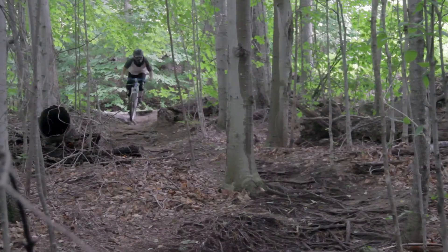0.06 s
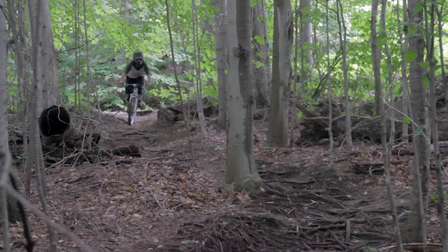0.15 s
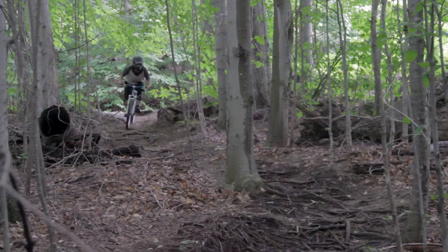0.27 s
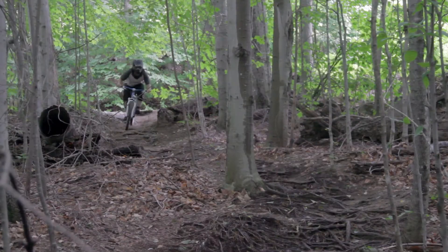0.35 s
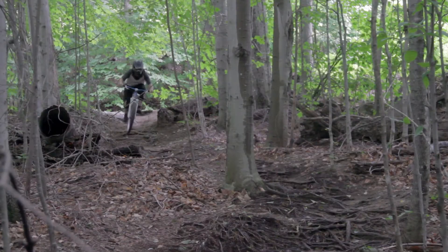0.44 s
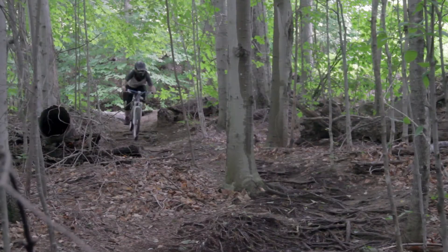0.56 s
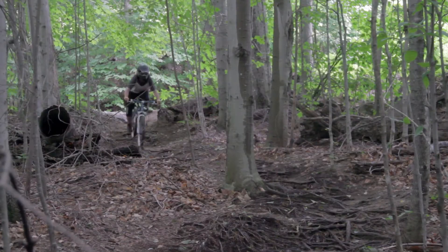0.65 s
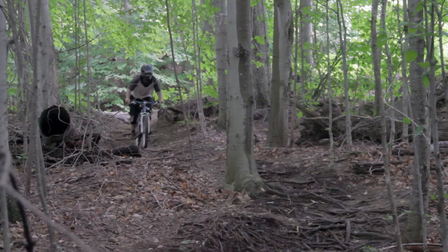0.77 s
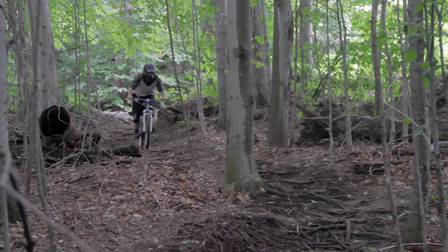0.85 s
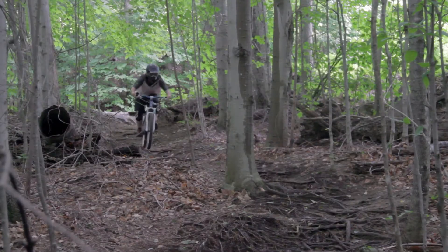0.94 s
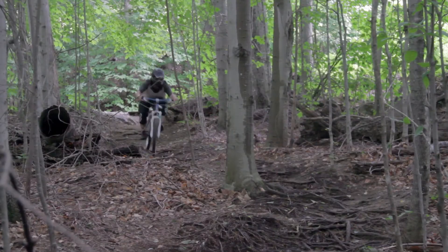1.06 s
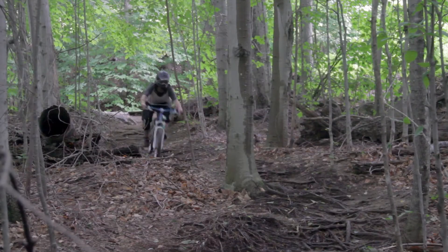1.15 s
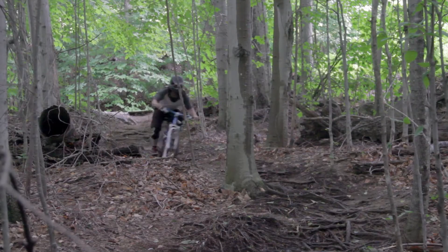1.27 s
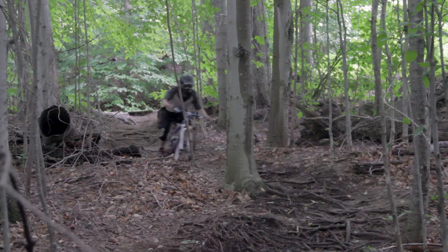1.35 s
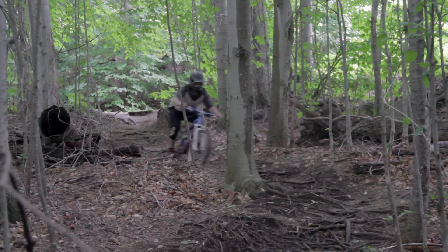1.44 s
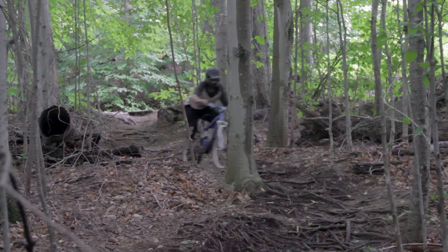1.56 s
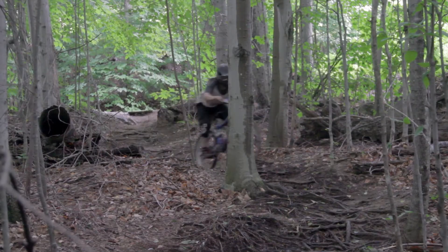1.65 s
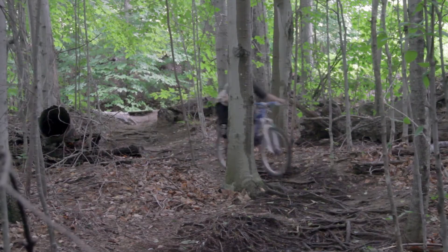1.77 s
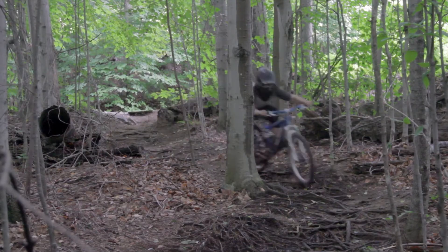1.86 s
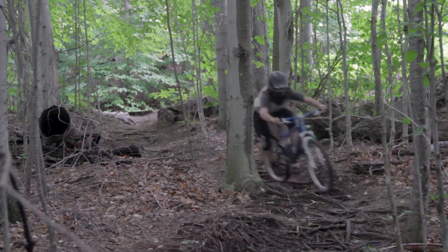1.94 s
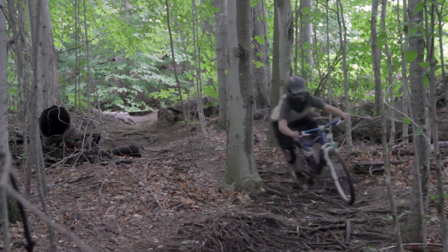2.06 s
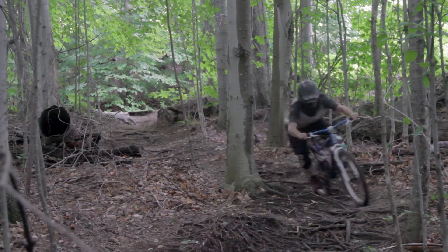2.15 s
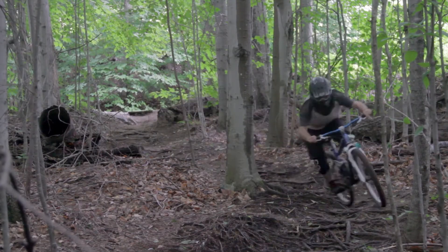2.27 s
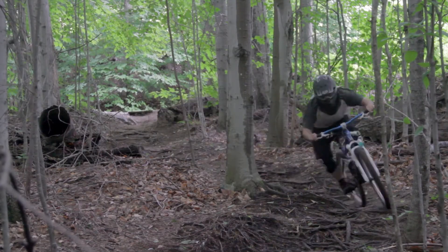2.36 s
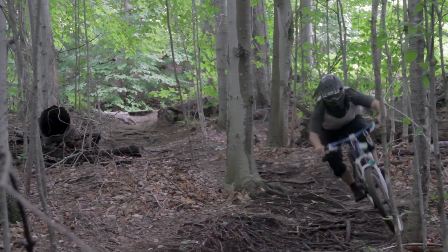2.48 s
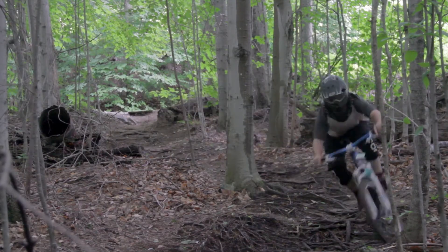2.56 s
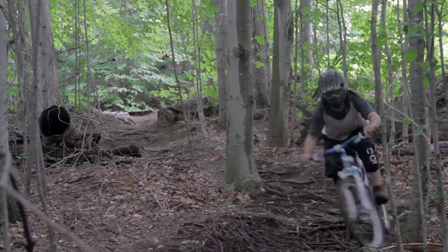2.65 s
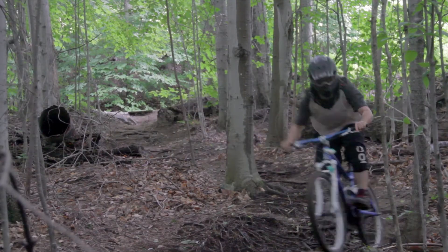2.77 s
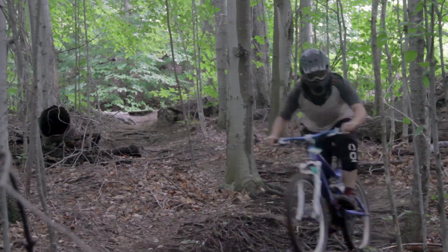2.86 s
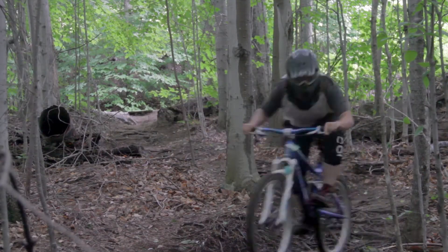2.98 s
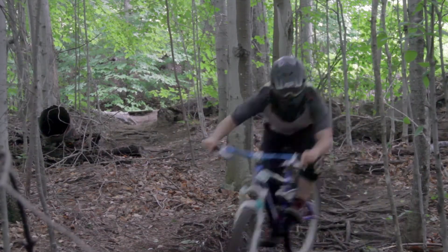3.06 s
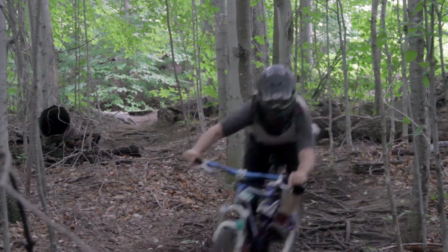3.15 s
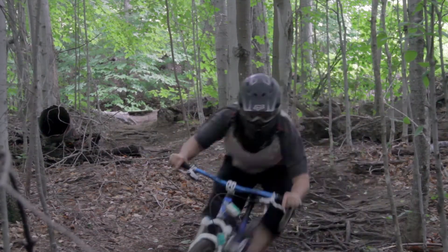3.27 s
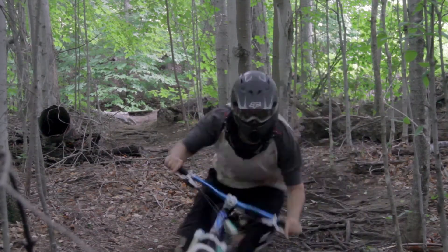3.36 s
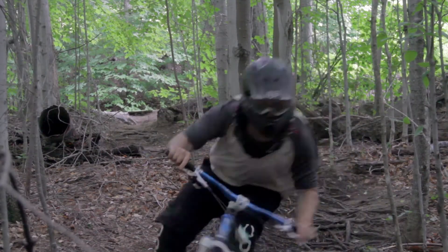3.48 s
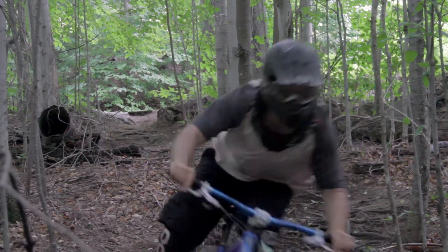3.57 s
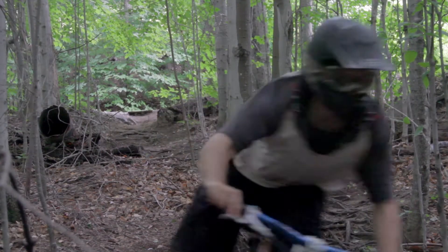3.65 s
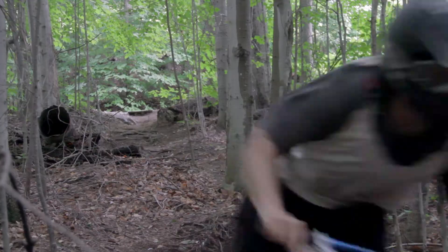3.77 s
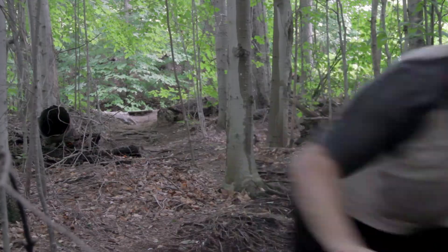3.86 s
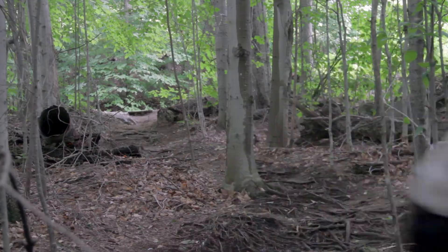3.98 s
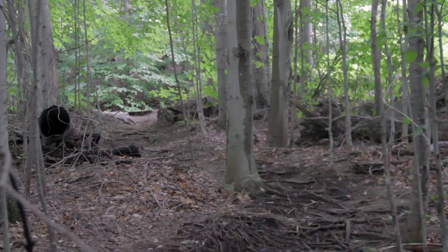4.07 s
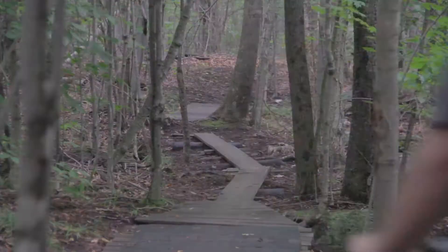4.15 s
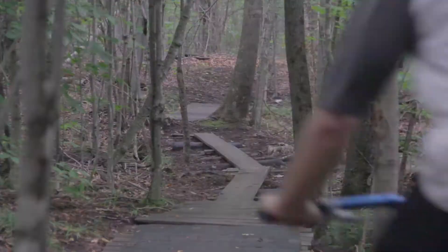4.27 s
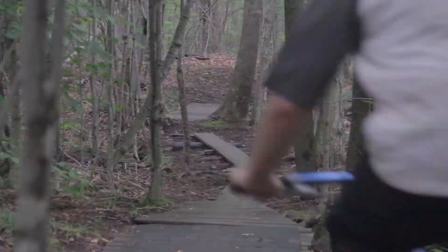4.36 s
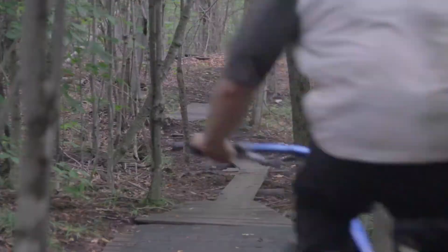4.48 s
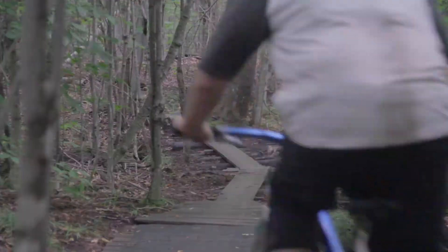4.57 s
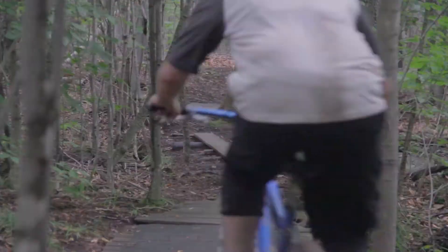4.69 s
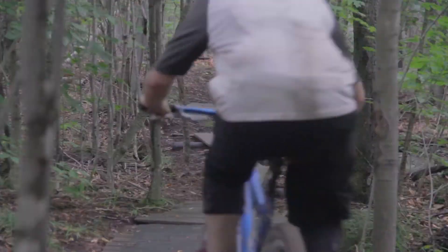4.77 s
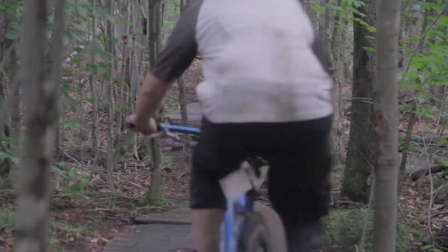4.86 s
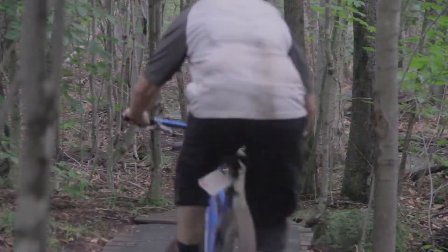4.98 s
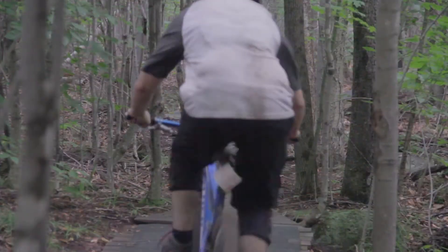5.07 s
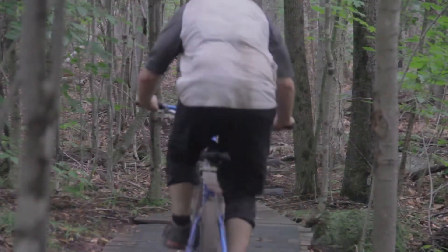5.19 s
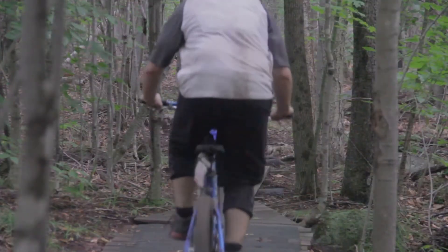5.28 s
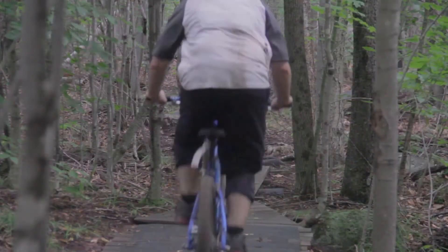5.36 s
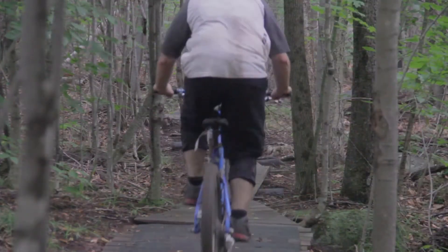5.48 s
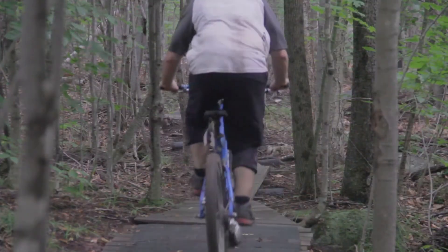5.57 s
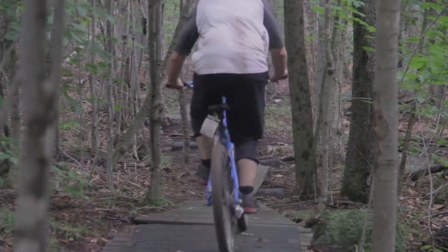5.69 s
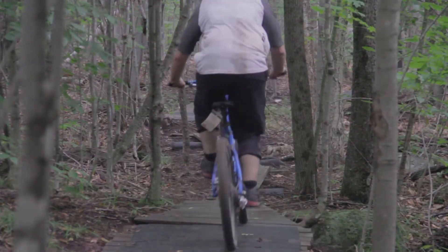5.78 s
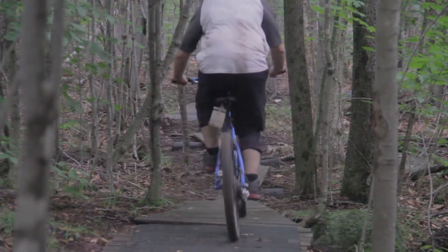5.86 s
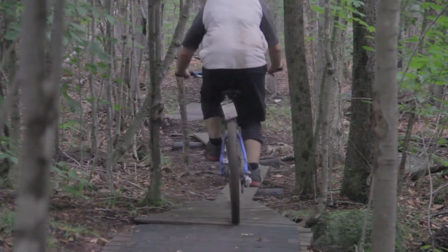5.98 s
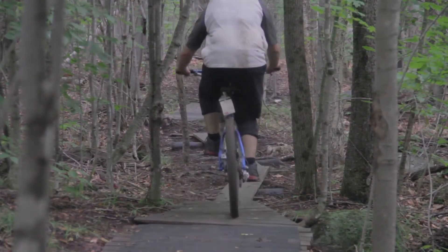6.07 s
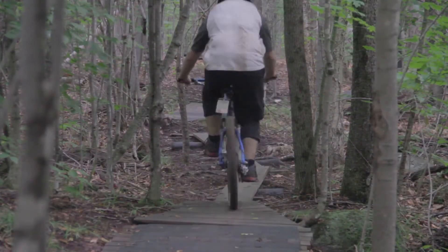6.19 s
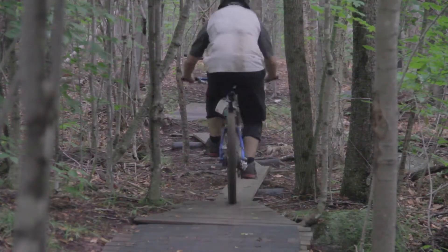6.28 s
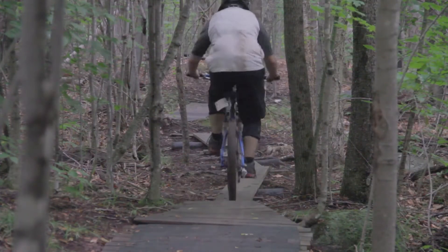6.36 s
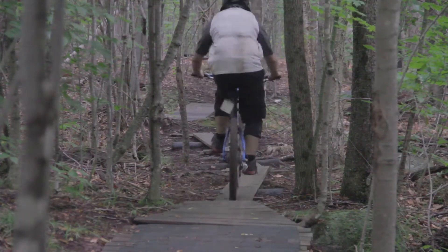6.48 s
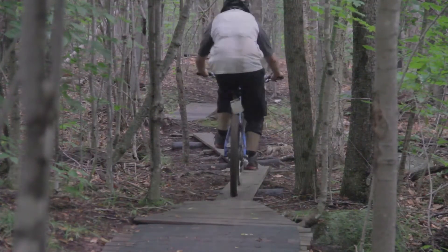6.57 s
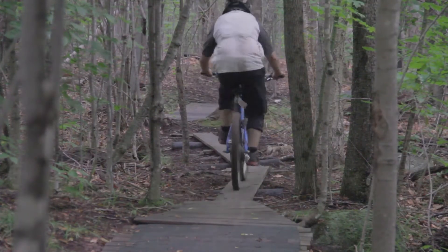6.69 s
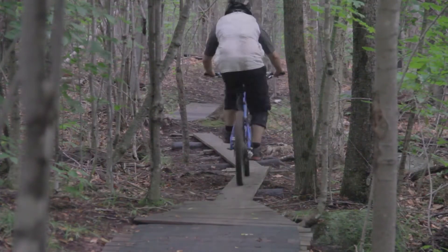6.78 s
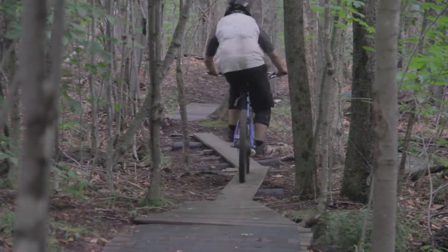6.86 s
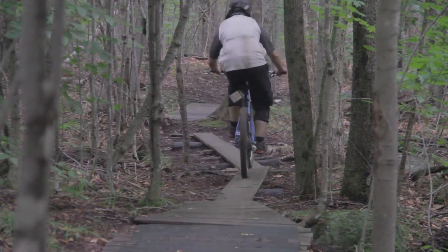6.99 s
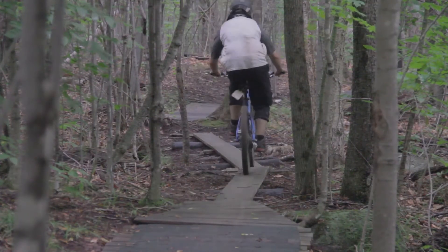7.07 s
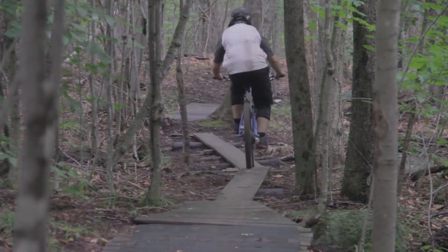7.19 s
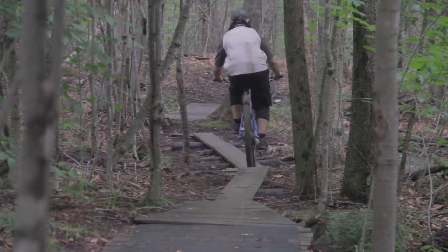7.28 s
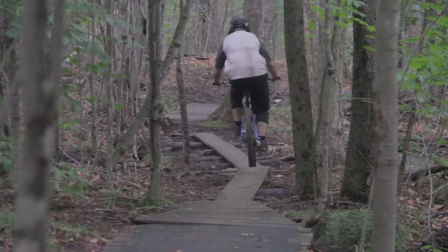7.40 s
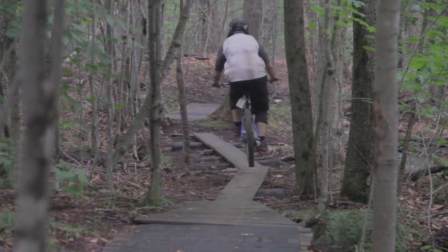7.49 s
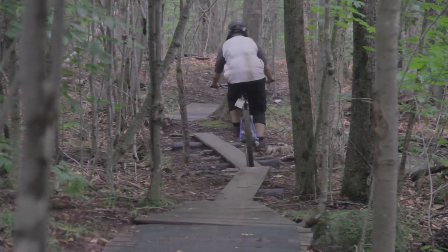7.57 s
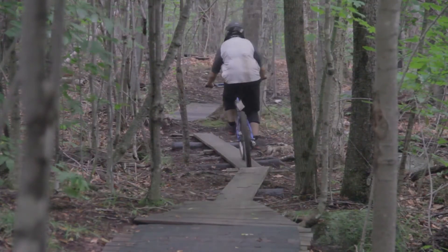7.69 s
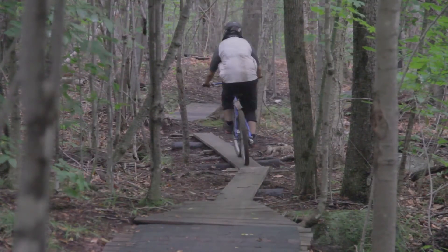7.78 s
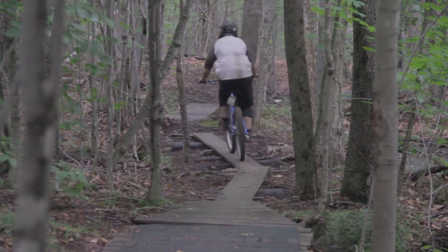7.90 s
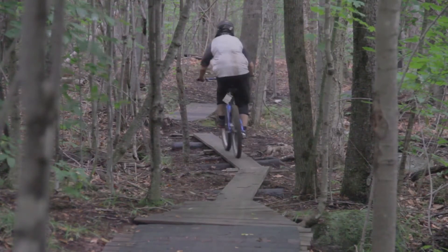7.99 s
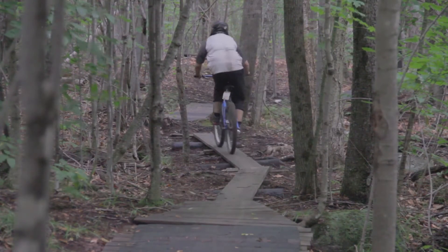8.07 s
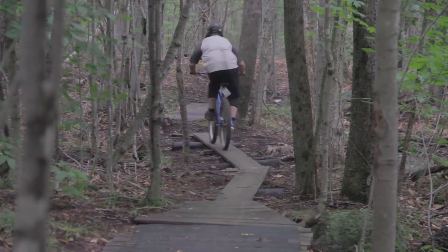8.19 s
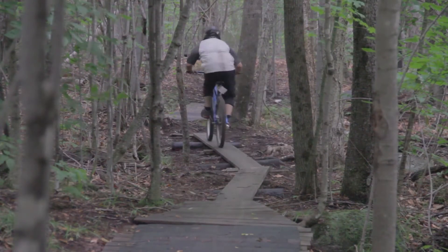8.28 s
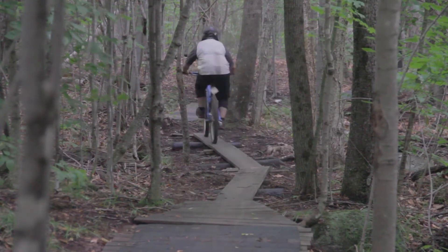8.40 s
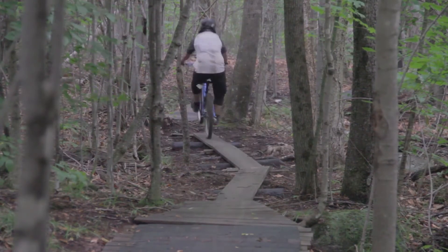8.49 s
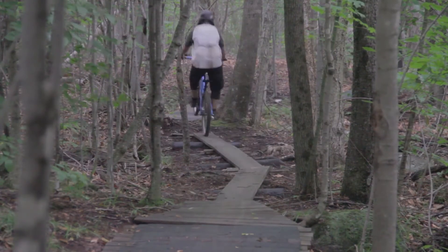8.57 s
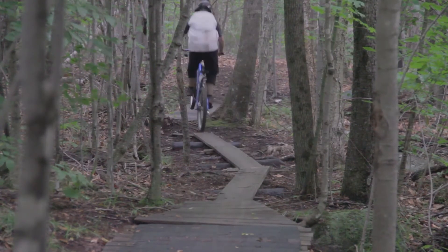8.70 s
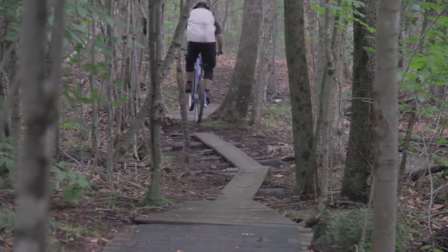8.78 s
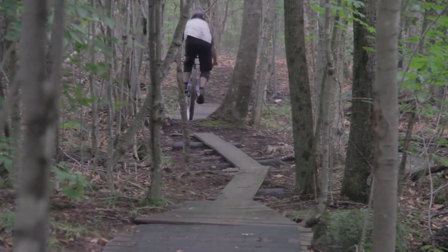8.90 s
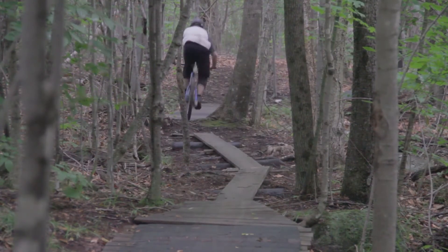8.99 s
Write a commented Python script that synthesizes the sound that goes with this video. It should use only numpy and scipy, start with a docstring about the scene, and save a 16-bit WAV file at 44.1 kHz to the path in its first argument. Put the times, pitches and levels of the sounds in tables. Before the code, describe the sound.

Outdoors among trees, a bicycle comes nearer with soft leaf crackle, low bumps and dry metallic clicks. After brief falling brake chirps the crunch swells, the frame clatters loudest and deep thumps land close to the microphone. Boards then knock and rumble under the tyres, clicks thin out, and only a few late leaf crackles remain over faint air and a thin insect tone.

```python
"""A mountain bike comes down a leafy forest trail: tyres crush leaves and dirt, chain and hub tick.
A disc brake squeaks in short falling tones; roots thump, and the frame knocks hardest as the bike passes.
Then planks drum and knock under the tyres, the bike rides away, and a few late leaves crackle.
Noise and random snaps make the rustle, struck resonances the knocks, dying noise bursts the ticks.
Tree trunks echo the sharp sounds; far leaves and an insect tone lie behind. Both channels are the same."""
import sys
import numpy as np
from scipy import signal
from scipy.fft import rfft, irfft
from scipy.io import wavfile

SR = 44100
rng = np.random.default_rng(int(sys.argv[2]) if len(sys.argv) > 2 else 0)


def store_pcm(level_fs):
    """Save levels as 16-bit WAV."""
    pcm = np.round(np.clip(level_fs, -1, 1) * 32767).astype(np.int16)
    wavfile.write(sys.argv[1], SR, np.atleast_2d(pcm).T)


N = 398663   # length of the scene in samples

# Steady rolling noise, before each layer's own level offset:
# (t/s, leaf rustle level/dB, dirt and twig crunch level/dB, low shaking level/dB)
ROLLING_LEVELS = [(0.0, -59.5, -60.5, -58.5), (0.3, -54, -56, -66), (0.64, -60, -61.5, -64),
                  (0.8, -55, -57, -62), (1.08, -65.5, -63, -63), (1.3, -54, -56, -60), (1.5, -52, -57, -63),
                  (1.75, -55, -58, -63), (1.94, -52.5, -55, -61), (2.09, -44, -51, -54),
                  (2.22, -44.5, -51, -57), (2.37, -47, -53.5, -60), (2.49, -49.5, -59, -62),
                  (2.66, -52, -50.5, -58), (2.9, -54, -53.5, -56), (3.1, -51, -50, -56),
                  (3.23, -44, -46, -54.5), (3.42, -41.5, -41.5, -53), (3.57, -48, -44.5, -50),
                  (3.9, -48.5, -46.5, -49), (4.03, -43.5, -43, -45), (4.21, -52.5, -50, -53),
                  (4.63, -51.5, -56.5, -54), (4.83, -53.5, -57.5, -59), (5.03, -48, -51, -54),
                  (5.19, -49, -55, -54), (5.46, -55, -58, -56.5), (5.75, -55, -57.5, -56),
                  (6.07, -62, -64.5, -58), (6.3, -65.5, -67, -65), (6.77, -69.5, -67.5, -71),
                  (7.33, -73.5, -69, -68.5), (7.92, -72.5, -67.5, -70), (8.12, -63, -63.5, -70),
                  (8.38, -71.5, -66, -68.5), (9.04, -68, -67, -68.5)]
# Tyres hit roots and plank edges; levels set the start of the thump and the top of each swell:
# (t/s, thump level/dB, thump f/Hz, rumble level/dB, wheel bounce level/dB, tyre air level/dB)
ROOT_AND_EDGE_HITS = [(0.178, -48, 37.6, -53, -49, -77), (0.367, -47.5, 101, -60, -60, -73),
                      (0.688, -47, 46.2, -51, -57, -67), (1.13, -58, 50, -64, -57, -80),
                      (1.36, -60, 50, -68, -51, -58), (1.61, -69, 50, -62, -50, -56),
                      (1.947, -43, 40, -49.5, -50, -66), (2.04, -58, 50, -55, -52, -56),
                      (2.19, -59, 46, -55, -51, -47.5), (2.511, -55, 80, -56, -53, -48.5),
                      (2.61, -40, 38.4, -45.5, -43, -53.5), (2.69, -55, 80, -47, -58, -51.5),
                      (2.83, -55, 50, -63, -44.5, -56), (3.43, -50, 60, -59, -48, -38),
                      (3.581, -33, 47, -47.5, -34, -53), (3.772, -32, 80, -41, -38, -37.5),
                      (3.86, -47, 80, -55, -60, -47), (3.948, -26.5, 168, -32, -30, -39),
                      (4.07, -52, 100, -55, -57, -44), (4.249, -47, 78.1, -46, -52, -49),
                      (4.47, -34.5, 38, -45.5, -55, -54), (4.735, -44, 74, -46.5, -56, -67),
                      (4.843, -35, 70, -62, -44, -55), (4.949, -58, 60, -50, -51.5, -48.5),
                      (5.079, -48, 43.1, -42.5, -45, -60), (5.313, -45, 185, -46, -57, -64),
                      (5.63, -55, 100, -55, -66, -74), (6.174, -57, 59.2, -52, -48.5, -67),
                      (6.342, -44.5, 171, -53.5, -60, -73.5), (6.401, -44, 155, -54, -50.5, -68),
                      (8.95, -69, 100, -65, -58, -81)]
ROUGH_FROM_DB = -56   # chance ticks and knocks come only where the crunch column is above this


def from_db(db):
    """Turn decibels into a gain."""
    return 10 ** (np.asarray(db) / 20)


def rms_one(x):
    """Scale a sound to an average strength (rms) of 1."""
    return x / np.sqrt(np.mean(x ** 2) + 1e-20)


def in_time(rows):
    """Draw straight lines between the rows of a table: each column at every sample."""
    s, *columns = np.transpose(rows)
    sample_times = np.arange(N) / SR
    return [np.interp(sample_times, s, column) for column in columns]


def at_hz(points, hz):
    """Read a level or time at a frequency, with frequency on a log scale."""
    table_hz, values = np.array(points).T
    return np.interp(np.log(hz + 1), np.log(table_hz), values)


def coloured(x, spectrum):
    """Filter a flat noise to the given spectrum, at rms 1."""
    gain = from_db(at_hz(spectrum, np.fft.rfftfreq(N, 1 / SR)))
    return rms_one(irfft(rfft(x) * gain, N))


def drift(rate_hz):
    """Slow random wander with spread 1: noise smoothed by two equal low-pass filters."""
    step = 40   # samples between the slow values
    r = np.exp(-2 * np.pi * step * rate_hz / SR)
    noise = rng.standard_normal(N // step + 2002)
    slow = signal.lfilter([1], [1, -2 * r, r * r], noise)[2000:]   # drop the filter's start
    return np.interp(np.arange(N) / step, np.arange(len(slow)), rms_one(slow))


def ring(x, hz, t60):
    """A resonance: a unit click starts a sine of height 1 that falls 60 dB in t60 seconds."""
    r = from_db(-60 / (t60 * SR))
    w = 2 * np.pi * hz / SR
    return signal.lfilter([0, np.sin(w)], [1, -2 * r * np.cos(w), r * r], x + 1e-18)


def add(out, s, sound):
    """Mix a sound in at time s."""
    i = round(s * SR)
    out[i:i + len(sound)] += sound[:N - i]


def crackle(per_s, spread_db, hiss, clump_db):
    """Random snaps of uneven size over friction hiss; a slow wander gathers both into clumps."""
    sizes = from_db(spread_db * np.minimum(rng.exponential(1, N), 5))
    signed_sizes = sizes * rng.choice([-1, 1], N)
    snaps = signed_sizes * (rng.random(N) < per_s / SR)
    return (rms_one(snaps) + hiss * rng.standard_normal(N)) * from_db(clump_db * drift(26.7))


def shaken(jolt_db, steady_db, fall_s):
    """A steady gain plus a quick swell at every root or plank edge."""
    rise_s = 0.015
    gain, t = from_db(steady_db), np.arange(SR // 2) / SR
    swell = np.minimum(t / rise_s, 1) * np.exp(-np.maximum(t - rise_s, 0) / fall_s)
    for hit, level_db in zip(ROOT_AND_EDGE_HITS, jolt_db):
        add(gain, hit[0], from_db(level_db) * swell)
    return gain


def thuds(events, swings):
    """A soft blow pushes a body into a few dying swings at one pitch."""
    out, t = np.zeros(N), np.arange(6000) / SR
    for s, level_db, hz in events:
        push = np.sin(2 * np.pi * hz * t) * np.exp(-t * hz / swings)
        add(out, s, from_db(level_db) * push * (1 - np.exp(-t / 0.00036)))   # soft start
    return out


def rolling():
    """Tyres break leaves and dirt into dense snaps, while rough ground makes a low rumble."""
    # Colour of crushed leaves: (f/Hz, relative level/dB)
    leaf_colour = [(1180, -31), (2000, -12), (2860, 0), (7840, -4.5), (11300, -4.5), (13300, -0.5),
                   (15100, -3), (16000, -18)]
    # Colour of crushed dirt and twigs: (f/Hz, relative level/dB)
    dirt_colour = [(120, -23), (200, -3.5), (316, -3), (461, -4), (749, -5), (1090, -5), (2420, -7.5),
                   (5000, -19.5), (6500, -35), (11000, -120)]
    # Colour of the low rumble: (f/Hz, relative level/dB)
    rumble_colour = [(32, -20), (55, -2.5), (108, -5.5), (167, -8), (243, -13.5), (280, -18.5), (360, -40),
                     (620, -120)]
    leaf_offset_db, dirt_offset_db, rumble_offset_db = 1.5, -1, 0.5
    jolt_crunch_db = -9.5   # a jolt also crushes dirt: level relative to its rumble
    leaf_db, dirt_db, low_db = in_time(ROLLING_LEVELS)
    jolt_db = np.transpose(ROOT_AND_EDGE_HITS)[3]
    leaves = coloured(crackle(5000, spread_db=4.0, hiss=1.03, clump_db=1.5), leaf_colour)
    dirt = coloured(crackle(1500, spread_db=3.5, hiss=0.98, clump_db=1.5), dirt_colour)
    dirt_gain = shaken(jolt_db + jolt_crunch_db, dirt_db + dirt_offset_db, fall_s=0.034)
    rumble = coloured(rng.standard_normal(N), rumble_colour)
    rumble_gain = shaken(jolt_db, low_db + rumble_offset_db, fall_s=0.042)
    return from_db(leaf_db + leaf_offset_db) * leaves + dirt_gain * dirt + rumble_gain * rumble


def tyre():
    """Rough ground shakes the wheel on its springy tyre and sets the tyre's air and casing ringing."""
    # Air ring and casing of the tyre: (f/Hz, relative level/dB, time to fall 60 dB/s)
    air_modes = [(313, 0.5, 0.079), (550, -6.5, 0.035), (690, -11, 0.085)]
    # Steady springing of the wheel between jolts: (t/s, level/dB)
    steady_bounce = [(0, -56.5), (1.55, -59), (1.7, -49.5), (2.25, -44.5), (2.4, -58), (3.3, -52.5),
                     (3.5, -47.5), (4.3, -52.5), (4.6, -62), (5.2, -61), (6.3, -63.5), (6.8, -72.5),
                     (9.04, -73)]
    air_offset_db = -5.5   # steady air ring, relative to the low shaking
    *_, bounce_db, air_db = np.transpose(ROOT_AND_EDGE_HITS)
    low_db = in_time(ROLLING_LEVELS)[2]
    steady_db = in_time(steady_bounce)[0]
    shake = rng.standard_normal(N)
    bounce = rms_one(ring(shake, 45.7, t60=0.11))
    air = rms_one(sum(from_db(db) * rms_one(ring(shake, hz, t60)) for hz, db, t60 in air_modes))
    bounce_gain = shaken(bounce_db, steady_db, fall_s=0.045)
    air_gain = shaken(air_db, low_db + air_offset_db, fall_s=0.052)
    return bounce_gain * bounce + air_gain * air


def sprays():
    """Tyres skid and leaves fly: short swells of dense crackle, each about an octave wide."""
    # Skids and flying leaves: (t/s, level/dB, centre f/Hz, rise time/s, fall time/s)
    spray_events = [(.185, -56, 2500, .01, 0.066), (.28, -49, 12500, .02, 0.095),
                    (.30, -54, 3470, 0.017, 0.14), (.72, -56, 2020, 0.012, 0.16),
                    (.740, -39.5, 12600, 0.0076, 0.075), (2.545, -40, 2080, .005, 0.086),
                    (2.695, -45, 2040, 0.0046, 0.083), (3.06, -49, 1200, 0.054, 0.067),
                    (4.3, -46.5, 2200, .03, 0.027), (4.46, -45.5, 2200, 0.022, 0.053),
                    (3.444, -37.5, 2220, 0.011, 0.12), (8.04, -52, 14000, .07, 0.075),
                    (8.0, -59.5, 1300, 0.087, 0.13), (8.04, -59, 4450, 0.073, .06),
                    (8.04, -61, 8600, 0.12, 0.053), (8.25, -61.5, 13500, .04, .04),
                    (8.47, -62.5, 704, 0.023, 0.047), (8.469, -64.5, 5000, 0.038, 0.069),
                    (8.725, -52, 10500, 0.022, 0.029), (8.746, -55.5, 2980, 0.012, 0.031),
                    (8.97, -56.5, 2200, 0.0087, 0.077)]
    out, t = np.zeros(N), np.arange(SR // 2) / SR
    grit = crackle(7200, spread_db=2.5, hiss=0.95, clump_db=1.0)
    for s, level_db, hz, rise, fall in spray_events:
        edges = [hz / 1.33, min(hz * 1.41, .45 * SR)]
        band = signal.butter(2, edges, "band", fs=SR, output="sos")
        start = round(s * SR) // 2   # which piece of the grit to use
        piece = rms_one(signal.sosfilt(band, grit[start:start + len(t)]))
        swell = np.minimum(t / rise, 1) * np.exp(-np.maximum(t - rise, 0) / fall)
        add(out, s, from_db(level_db) * swell * piece)
    return out


def small_ticks():
    """Chance ticks on rough ground, whose level follows the leaf rustle."""
    per_s, above_rustle_db = 5.0, 8
    leaf_db, dirt_db, _ = in_time(ROLLING_LEVELS)
    at = np.flatnonzero((rng.random(N) < per_s / SR) & (dirt_db > ROUGH_FROM_DB))
    luck = rng.standard_normal((N, 2))[at] * [3, 4]   # spread of level and dullness
    return np.transpose([at / SR, leaf_db[at] + above_rustle_db + luck[:, 0], luck[:, 1]])


def ticks():
    """Chain and hub parts strike: a dry crack of noise, with small steel parts ringing along."""
    # Chain and hub ticks: (t/s, crack peak level/dB, dullness/dB per octave)
    drive_ticks = [(0.0762, -35, 1), (0.184, -35.5, 4.5), (0.3391, -36, 4), (0.3611, -34.5, 5),
                   (0.3783, -34, 4), (0.455, -39.5, 5), (0.7154, -33, 4), (0.741, -33.5, 4.5),
                   (1.127, -45, -10), (1.207, -43, -4.5), (1.369, -32.5, 1), (1.4603, -36, -2),
                   (1.5005, -40, -5), (1.6048, -35.5, -1), (1.6467, -36.5, 4), (1.838, -36.5, 3.5),
                   (1.9829, -36, 2), (2.0002, -28.5, 1), (2.0567, -19.5, -0.5), (2.1844, -18.5, -2.5),
                   (2.2946, -23.5, -1), (2.4114, -25.5, 1), (2.6327, -32, 1), (2.8634, -31.5, 3.5),
                   (3.025, -32, 9), (3.043, -27.5, -7), (3.3263, -33, 6), (3.3532, -22.5, 3),
                   (3.3757, -31, 5.5), (3.4322, -20, 3.5), (3.467, -25, -5), (3.714, -24, 2),
                   (3.7349, -32, -12.5), (3.7693, -28, -8), (3.7915, -29, 5), (3.8167, -22, -1.5),
                   (3.8432, -25, -10), (3.9015, -29, -3), (3.9379, -24.5, -4), (3.9729, -28, -8),
                   (4.007, -22.5, 2.5), (4.1754, -34, -10), (4.206, -28, -5), (4.256, -25, -4.5),
                   (4.3158, -32.5, 4), (4.86, -20, -8), (4.8765, -24, 2), (5.029, -28, -5),
                   (5.0577, -30.5, 3.5), (5.1018, -28, -1), (5.119, -26.5, -4), (5.15, -19, -11),
                   (5.162, -13.5, -1.5), (5.3308, -32.5, 0.5), (5.4273, -34, 2), (5.471, -30.5, -6),
                   (5.5677, -33, -3), (5.5962, -34, -5), (5.652, -27.5, -2.5), (5.6805, -31, 0),
                   (5.7304, -29.5, -3.5), (5.7806, -34, -10), (5.8355, -33, -1.5), (6.10, -50, -2),
                   (6.1458, -36.5, -3.5), (6.1828, -35, -1.5), (6.3674, -32.5, -1), (6.4722, -32.5, -2),
                   (7.2843, -40, -2), (7.4819, -32.5, -5), (7.577, -35, -5.5), (7.68, -47.5, 0),
                   (7.7827, -31.5, -5), (8.508, -47, -6), (8.5639, -43, 4)]
    # Small steel parts: (f/Hz, relative level/dB, time to fall 60 dB/s)
    steel_modes = [(5300, -1.5, 0.0082), (7020, -16, 0.0094), (7740, -13, 0.0043), (8170, -1.5, 0.0098),
                   (9540, -2, 0.012), (11070, -2, 0.013), (12000, -1, .010), (14000, -30, 0.01),
                   (14120, -1, 0.017), (15200, -6, .008)]
    # How the ticks change along the ride: (t/s, steel ring level relative to crack/dB, crack decay/s)
    tick_kind = [(0, -16, 0.0067), (4.1, -16, 0.0063), (4.3, -15, 0.0049), (5.3, -17.5, 0.0049),
                 (5.6, -12.5, 0.0053), (9.04, -12, .003)]
    ring_loss_db = 0.3   # steel ring lost per dB of dullness
    steel_lean = .5      # share of the dullness that tilts the steel ring
    pivot_hz = 7000      # dullness tilts the sound around this pitch
    s, peak_db, dull_db = np.concatenate([drive_ticks, small_ticks()]).T
    at = np.round(s * SR).astype(int)
    ring_db, crack_s = np.array(in_time(tick_kind))[:, at]
    strike_db = peak_db + ring_db - ring_loss_db * dull_db
    luck_db = rng.normal(0, 2.5, (len(s), len(steel_modes)))
    out = np.zeros(N)
    for k, (hz, level_db, t60) in enumerate(steel_modes):
        lean_db = -steel_lean * dull_db * np.log2(hz / pivot_hz)
        clicks = np.zeros(N)
        clicks[at] = from_db(strike_db + level_db + lean_db + luck_db[:, k])
        out += ring(clicks, hz, t60) * (-1) ** k   # alternate signs
    t = np.arange(600) / SR
    hz = np.fft.rfftfreq(len(t), 1 / SR) + 1
    decay = np.exp(-t / np.maximum(crack_s, .001)[:, None])
    bursts = rng.standard_normal((len(s), len(t))) * decay * (1 - np.exp(-t / 0.00025))
    tilt = from_db(-dull_db[:, None] * np.log2(np.maximum(hz, 2500) / pivot_hz))
    bass_cut = 1 / np.sqrt(1 + (2200 / hz) ** 4)
    cracks = irfft(rfft(bursts) * tilt * bass_cut, len(t))
    for when, level_db, crack in zip(s, peak_db, cracks):
        add(out, when, from_db(level_db) * crack / np.abs(crack).max())
    return out


def small_knocks():
    """Chance knocks on rough ground, whose level follows the dirt crunch."""
    per_s, above_crunch_db, length_s = 12.0, 6.5, .004
    dirt_db = in_time(ROLLING_LEVELS)[1]
    at = np.flatnonzero((rng.random(N) < per_s / SR) & (dirt_db > ROUGH_FROM_DB))
    luck = rng.standard_normal((N, 3))[at]
    level_db = dirt_db[at] + above_crunch_db + 3.76 * luck[:, 0]
    low_db = -4 + 5.0 * luck[:, 1]
    high_db = -8 + 5.7 * luck[:, 2]
    return np.transpose([at / SR, level_db, low_db, high_db, np.full(len(at), length_s)])


def knocks():
    """A quick volley of contacts sets resonances ringing; each blow weighs low and high its own way."""
    # Knocks of frame, planks and twigs, before chance:
    # (t/s, level/dB, low-mode lean/dB, high-mode lean/dB, volley decay/s)
    knock_events = [(0.076, -48.5, -23, 3.5, .004), (0.714, -37, -19, -20.5, .004),
                    (1.9826, -40.5, 2.5, 7, .0057), (2.1877, -37, -18, 4.5, 0.0048),
                    (2.327, -35.5, -18, -1, 0.0036), (2.412, -51, -15, 19, 0.0033),
                    (2.522, -40, -18, -9, 0.0061), (2.5394, -26, -8.5, -5, .006),
                    (2.688, -21.5, -9, -15, 0.001), (3.024, -39, -5, -29, .0048),
                    (3.356, -48, 1, -13, .004), (3.4281, -8.5, -34, -11.5, 0.0043),
                    (3.431, -4.5, -15, -10.5, 0.00079), (3.4341, -17, -25, 3.5, 0.0016),
                    (3.585, -36, 3, 1, .004), (3.618, -32, -10, -1, .004), (3.732, -34, 9.5, -16, 0.0051),
                    (3.769, -31, -9, -11, 0.0049), (3.783, -31.5, -6, 0, .0046),
                    (3.8523, -21, -3, -9.5, 0.0035), (3.856, -19.5, -13, -4.5, 0.0023),
                    (3.9429, -22, -0.5, -10.5, .004), (3.965, -31, 2, -12, .008),
                    (4.007, -27, -1.5, -9, 0.0069), (4.042, -37.5, 10.5, 8.5, 0.0042),
                    (4.175, -44, -10, -4, .007), (4.227, -43.5, 9.5, -19, .0036),
                    (4.272, -33, -0.5, -17, .0037), (4.33, -36.5, 1, -5, .008),
                    (4.4076, -37, 1, -7.5, 0.0055), (4.752, -41.5, 3.5, -3, 0.0071),
                    (4.866, -36, -4, -5, 0.0043), (5.06, -39.5, -6, -13, 0.0033),
                    (5.0973, -45, -9, -6, .0048), (5.1646, -34, -3, 4, 0.0042),
                    (5.933, -40, -14, -14, .004), (5.965, -43, -24, -6, 0.0034),
                    (6.4135, -45, -3, -12, 0.005), (7.9708, -51, -12.5, -5, .002),
                    (8.961, -46, -11, 1.5, 0.0036), (8.9785, -48, -17.5, -9, .004)]
    # What the knocks ring with: (f/Hz, relative level/dB, time to fall 60 dB/s)
    frame_modes = [(544, -0.5, 0.016), (694, 1, 0.022), (876, 3.5, 0.013), (1232, 0.5, 0.01),
                   (1464, 2, 0.008), (1758, -3, 0.019), (2037, -0.5, 0.017), (2440, 4, 0.0085),
                   (3123, 6, 0.0032), (3330, -5.5, 0.013), (3907, 0.5, 0.0032)]
    t = np.arange(1500) / SR
    blows = np.concatenate([knock_events, small_knocks()])
    # multiplying two noises gives a few strong contacts among many weak ones
    volleys = np.prod(rng.standard_normal((len(blows), len(t), 2)), axis=2)
    volleys[:, 0] = 1.47   # the first contact is always firm
    luck_db = rng.normal(0, 1.6, (len(blows), len(frame_modes)))
    out = np.zeros(N)
    for k, (hz, mode_db, t60) in enumerate(frame_modes):
        drive = np.zeros(N)
        for (s, level_db, low_db, high_db, length), volley, chance_db in zip(blows, volleys, luck_db[:, k]):
            lean_db = at_hz([(700, low_db), (1400, 0.0011), (2600, high_db)], hz)
            shaped = volley * np.exp(-t / max(length, .0005))
            # even out how strongly volleys drive this mode: total energy and energy at its pitch
            energy = np.sum(shaped ** 2)
            energy_at_hz = abs(shaped @ np.exp(2j * np.pi * hz * t)) ** 2
            reach = .25 * energy + .75 * energy_at_hz
            add(drive, s, from_db(level_db + mode_db + lean_db + chance_db) * shaped / np.sqrt(reach))
        out += ring(drive, hz, t60) * (-1) ** k   # alternate signs
    return out


def brake():
    """Pad and disc lock into a short tone that slides down."""
    # Brake squeaks: (t/s, peak level/dB, start f/Hz, length/s)
    squeaks = [(1.379, -26, 13100, .005), (1.382, -16.5, 12630, 0.0084), (1.392, -22, 12840, 0.0064),
               (1.403, -30, 12100, 0.008), (1.42, -25, 12540, 0.0044), (1.432, -14, 12220, 0.011),
               (1.437, -23, 11900, 0.0083), (1.457, -22, 11940, 0.01), (2.269, -15.5, 14900, .010),
               (2.278, -22, 14600, .005), (2.303, -23, 14650, 0.0056)]
    slide_hz_per_s = 36000
    out = np.zeros(N)
    for s, peak_db, start_hz, length in squeaks:
        n = round(length * SR)
        hz = start_hz - slide_hz_per_s * np.arange(n) / SR
        phase = 2 * np.pi * np.cumsum(hz) / SR
        swell = np.sin(np.linspace(0, np.pi, n)) ** 0.66
        add(out, s, from_db(peak_db) * np.sin(phase) * swell)
    return out


def plank_knocks():
    """Hollow planks answer a blow with a few dying swings."""
    # Hollow plank knocks: (t/s, level at the start of the decay/dB, f/Hz)
    plank_events = [(5.096, -39, 486), (5.328, -43, 400), (5.81, -41.5, 457), (5.628, -40, 468),
                    (6.351, -32.5, 460), (6.416, -45, 544), (8.499, -48, 546)]
    return thuds(plank_events, swings=2.15)


def boards():
    """Tyre knobs patter on the planks and keep their low modes sounding."""
    # Drumming of the boards under the tyres: (t/s, level/dB)
    drumming = [(0, -95), (4.1, -90), (4.3, -56.5), (5.2, -61), (6.0, -61), (6.5, -66.5), (7.0, -74),
                (9.04, -76)]
    # Low modes of the boards: (f/Hz, relative level/dB, time to fall 60 dB/s)
    board_modes = [(453, 0, .03), (590, -0.5, 0.027), (740, -3, 0.021)]
    patter = crackle(400, spread_db=3.5, hiss=.8, clump_db=2.5)
    drum = rms_one(sum(from_db(db) * ring(patter, hz, t60) for hz, db, t60 in board_modes))
    return from_db(in_time(drumming)[0]) * drum


def trunks(x):
    """Tree trunks return countless small echoes: noise that swells after a gap and dies band by band."""
    # Time for the echoes to fall 60 dB: (f/Hz, time/s)
    echo_t60 = [(300, 0.17), (2000, 0.3), (6000, 0.42), (13000, 0.45)]
    # Thin trunks return little bass: (f/Hz, relative level/dB)
    scatter = [(300, -3), (1000, -0.5), (2500, 1.5), (13000, 1.5)]
    level_db, gap_s = -4.5, 0.0037
    t, tail = np.arange(SR) / SR, 0
    edges = np.geomspace(150, 18000, 8)
    for low, high in zip(edges, edges[1:]):
        band_filter = signal.butter(2, [low, high], "band", fs=SR, output="sos")
        band = signal.sosfilt(band_filter, rng.standard_normal(SR))
        hz = np.sqrt(low * high)   # middle of the band
        tail = tail + band * from_db(at_hz(scatter, hz) - 60 * t / at_hz(echo_t60, hz))
    tail = tail * (1 - np.exp(-(t / gap_s) ** 2))
    tail = tail / np.sqrt(np.sum(tail ** 2))
    return from_db(level_db) * signal.fftconvolve(x, tail)[:N]


def woods():
    """Far leaves and air as steady coloured noise, and a thin insect tone as a noise-driven resonance."""
    # Colour of far leaves and air: (f/Hz, relative level/dB)
    woods_colour = [(12, -35), (20, 5.5), (150, -17.5), (210, -13.5), (328, -25), (377, -14.5),
                    (422, -15.5), (590, -14.5), (949, -21), (3530, -46), (4180, -29.5), (7950, -34.5),
                    (16000, -27)]
    woods_db, insect_db = -59.5, -79.5   # rms levels
    air = coloured(rng.standard_normal(N), woods_colour)
    insect = rms_one(ring(rng.standard_normal(N), 4230, t60=.08))
    return from_db(woods_db) * air + from_db(insect_db) * insect


def scene():
    """Mix the wheels, the drive and the sharp sounds with their echoes over the woods."""
    thumps = thuds(np.array(ROOT_AND_EDGE_HITS)[:, :3], swings=2.7)
    wheels = thumps + tyre() + rolling() + sprays() + boards()
    sharp = ticks() + knocks() + brake() + plank_knocks()
    mono = wheels + sharp + trunks(sharp) + woods()
    return np.array([mono, mono])


def record(dry):
    """Cut the top steeply: 70 dB down from 16200 Hz upward."""
    return signal.sosfilt(signal.cheby2(24, 70, 16200, fs=SR, output="sos"), dry)


dry = scene()
out = record(dry)
store_pcm(out)
```